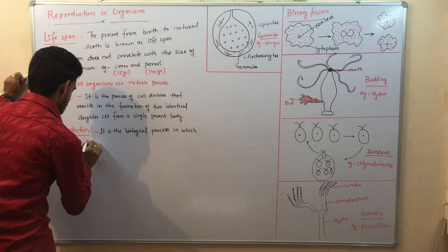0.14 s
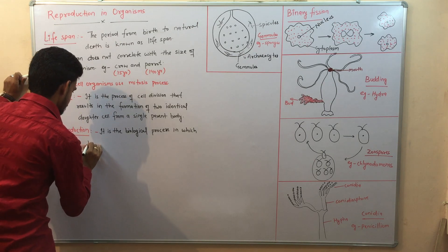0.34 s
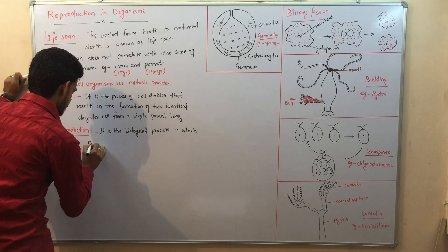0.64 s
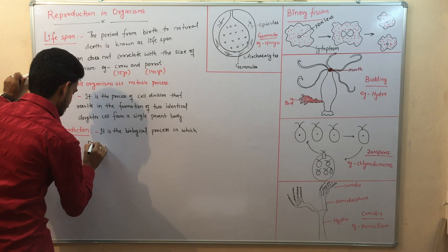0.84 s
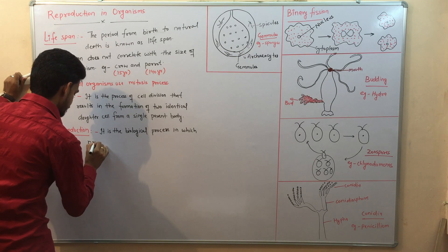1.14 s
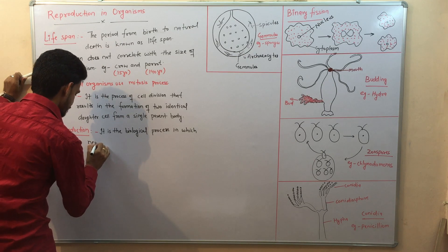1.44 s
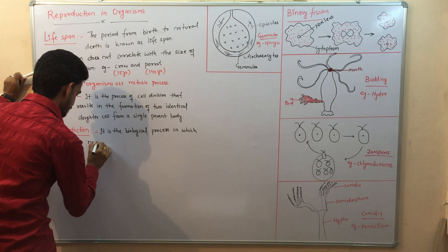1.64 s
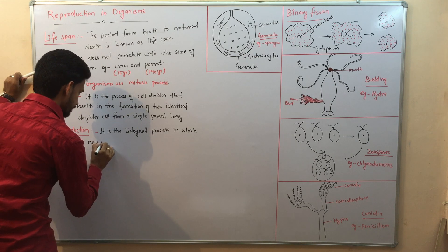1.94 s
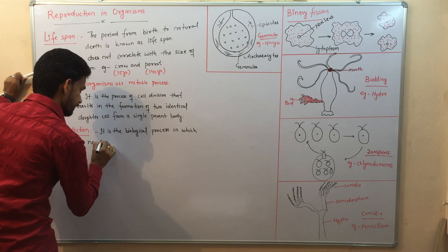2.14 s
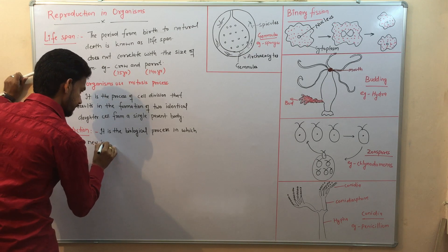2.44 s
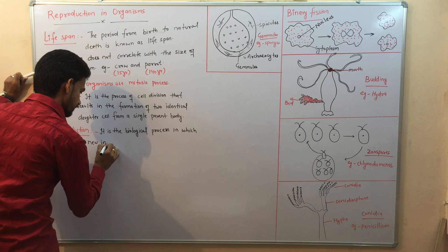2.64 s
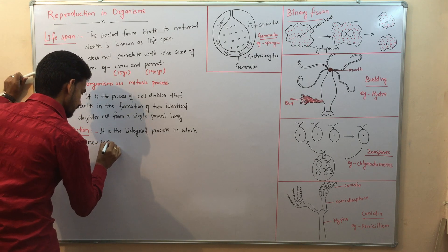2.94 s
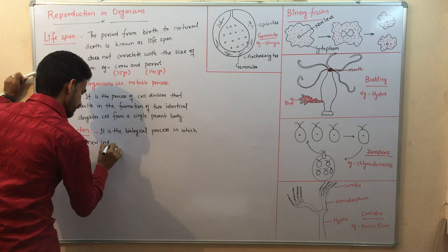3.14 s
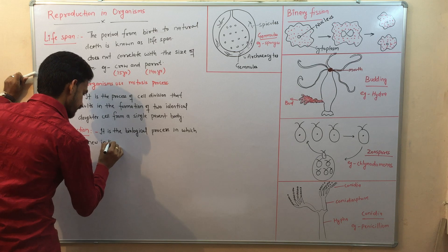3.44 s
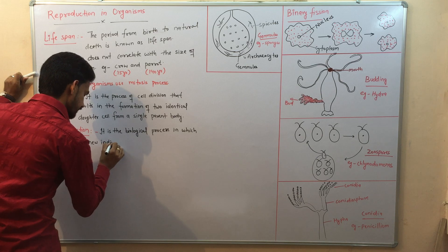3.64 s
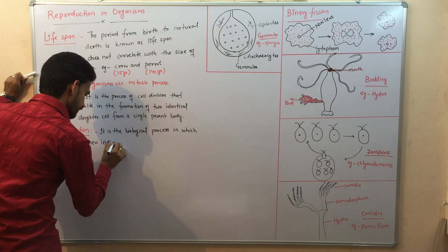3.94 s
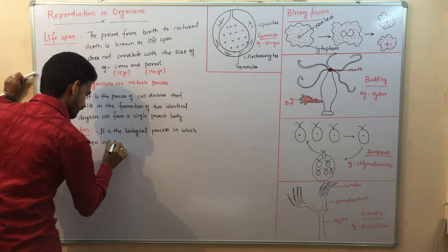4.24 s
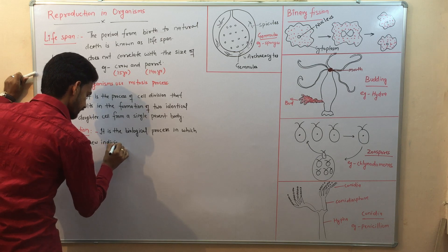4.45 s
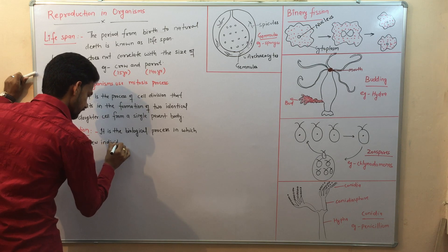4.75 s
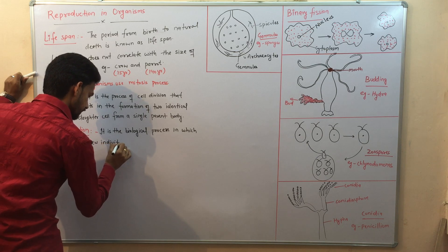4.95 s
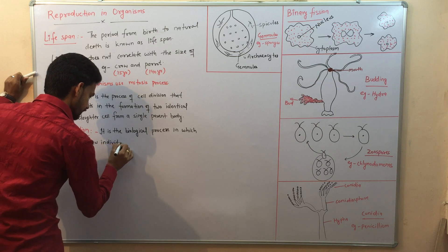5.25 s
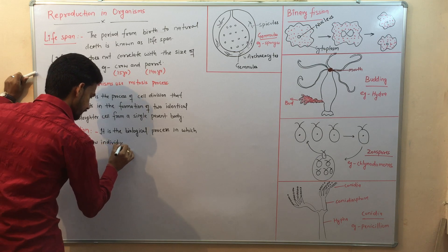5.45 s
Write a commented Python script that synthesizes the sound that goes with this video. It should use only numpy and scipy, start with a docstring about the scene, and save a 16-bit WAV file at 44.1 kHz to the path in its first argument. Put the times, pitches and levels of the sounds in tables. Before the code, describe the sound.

A felt marker writes in quick hissing strokes on a whiteboard, with hollow taps, tiny clicks and a low hum in a quiet room.

```python
"""A felt marker writes on a thin wall-hung whiteboard in a quiet room. Its nib hisses in short strokes: noise
shaped by the ringing of nib and barrel. The sliding also drags on the board, and the nib sometimes squeaks.
Pen and knuckle taps ring the board's modes and rattle it; the pen's plastic ticks now and then.
The board sways under taps and hand. A low hum and broad room noise lie under it all."""
import sys
import numpy as np
from scipy import signal
from scipy.fft import rfft, irfft, next_fast_len
from scipy.io import wavfile
from scipy.ndimage import uniform_filter1d, map_coordinates

SR = 44100
rng = np.random.default_rng(int(sys.argv[2]) if len(sys.argv) > 2 else 0)


def to_wav(s):
    """Save 16-bit WAV."""
    ch = np.atleast_2d(s).T  # columns
    pcm = np.round(np.clip(ch, -1, 1) * 32767)  # PCM
    wavfile.write(sys.argv[1], SR, pcm.astype(np.int16))


def ratio_of_db(decibels):
    """Turn decibels (scalar or array-like) into linear amplitude factors; 0 dB maps to 1."""
    return 10 ** (np.asarray(decibels, float) / 20)


N = 247448  # length of the scene in samples


def unit(x):
    """Scales a sound to rms 1."""
    return x / np.sqrt(np.mean(x ** 2) + 1e-20)


def along(points, hz):
    """Reads a curve of (f/Hz, value) points on a log frequency axis."""
    f, value = np.transpose(points)
    return np.interp(np.log(hz + 1), np.log(f + 1), value)


def curves(rows):
    """Draws one curve over the whole scene for each column after the time."""
    s, *columns = np.transpose(rows)
    return [np.interp(np.arange(N) / SR, s, column) for column in columns]


def wobble(rate):
    """A smooth random curve through `rate` random points a second."""
    points = rng.standard_normal(int(N * 400 / SR) + 4)
    return map_coordinates(points, [np.arange(N) * rate / SR])


def filtered(x, response):
    """Filters x by a (possibly complex) response of frequency."""
    m = next_fast_len(N + SR // 2)
    return irfft(rfft(x, m) * response(np.fft.rfftfreq(m, 1 / SR)), m)[:N]


def noise(spectrum):
    """Coloured noise of rms 1."""
    return unit(filtered(rng.standard_normal(N), lambda hz: ratio_of_db(along(spectrum, hz))))


def resonance(hz, centre, width):
    """One causal resonance of peak gain 1."""
    return 1j * hz * width / (centre ** 2 - hz ** 2 + 1j * hz * width)


def add(track, s, sound):
    """Mixes a sound into the track at time s."""
    track[round(s * SR):][:len(sound)] += sound


def patchy(x, patchy_db):
    """Random gain patches in time and frequency: the contact keeps changing."""
    z = signal.stft(x, nperseg=256)[2]
    across_pitch = uniform_filter1d(rng.standard_normal(z.shape), size=4, axis=0)
    field = uniform_filter1d(across_pitch, size=10, axis=1)
    return signal.istft(z * ratio_of_db(patchy_db * unit(field)), nperseg=256)[1][:N]


# pen strokes; the levels set the balance between strokes, before each layer's overall gain:
# (start t/s, rise t/ms, length t/ms, hiss level/dB, drag on the board level/dB above the hiss)
PEN_STROKES = [(0.31, 55, 110, -60, -5.5), (0.46, 7.7, 82, -61.5, -4), (.544, 130, 100, -58, -7.5),
               (.862, 17, 40, -75.5, 2), (.914, 35, 68, -67, -3.5), (1.004, 55, 113, -65.5, -6.5),
               (1.268, 7.2, 83, -65.5, -4), (1.376, 49, 41, -62.5, -3), (1.467, 5.5, 70, -66.5, -5.5),
               (1.568, 82, 82, -58, -4.5), (1.721, 16, 115, -86, 8.5), (1.954, 25, 97, -62, -4.5),
               (2.19, 3.9, 89, -81, 8), (2.353, 29, 76, -59.5, -7), (2.475, 33, 105, -60.5, -1),
               (2.572, 38, 90, -61.5, -6.5), (2.798, 8.1, 76, -67.5, 2), (2.851, 49, 118, -67, 1),
               (2.985, 68, 86, -58.5, -8), (3.105, 15, 81, -55, -10), (3.334, 16, 76, -58, -7.5),
               (3.57, 35, 40, -68, -1), (3.717, 4, 92, -57.5, -7.5), (3.852, 2.3, 91, -56, -4),
               (4.039, 9.5, 86, -62, -6.5), (4.285, 8.8, 42, -75, -4), (4.469, 4.3, 32, -76, 15),
               (4.498, 17, 125, -65, -1.5), (4.637, 130, 110, -58.5, -2), (4.777, 21, 96, -60.5, -6.5),
               (4.986, 3.6, 21, -79.5, 13.5), (5.029, 11, 92, -62.5, -2), (5.127, 81, 97, -58, 0),
               (5.385, 8.3, 27, -74, 9), (5.436, 9.9, 93, -63.5, -3.5), (5.547, 35, 132, -66, -6)]
# the barrel rings relatively more in soft and in slowly rising strokes: level of an average stroke in dB,
# dB lost per dB of hiss, dB gained per doubling of the rise over 20 ms
USUAL_DB, BARREL_PER_DB, BARREL_PER_RISE_DB = -64.5, 0.89, 1.5
BITE, LIFT = 0.55, 3.6  # how sharply a stroke starts (small = sudden) and ends (large = sudden)


def strokes():
    """Each stroke's speed drives the hiss of the felt, the ring of the barrel and the drag on the board."""
    power, ms = np.zeros((3, N + SR)), np.arange(SR // 3) * 1000 / SR
    for s, rise_ms, length_ms, db, drag_db in PEN_STROKES:
        barrel_db = BARREL_PER_RISE_DB * np.log2(rise_ms / 20) - BARREL_PER_DB * (db - USUAL_DB)
        # the nib bites at once, gains speed, then lifts off
        speed = np.minimum(ms / rise_ms, 1) ** BITE * np.exp(-(ms / length_ms) ** LIFT)
        for row, extra_db in zip(power, (0, barrel_db, drag_db)):
            add(row, s, (ratio_of_db(db + extra_db) * speed) ** 2)
    slide, barrel, drag = np.sqrt(power[:, :N] + 1e-12)
    # the fibres slip in dense grains: fast and slower wobbles of the level in dB
    slips = unit(ratio_of_db(0.33 * wobble(300) + 1.8 * wobble(40)))
    hiss = ratio_of_db(5.5) * slide * slips * felt(stroke_barrel_db=20 * np.log10(barrel / slide))
    return hiss + skin_drag(drag) + board_drag(drag)


# colour of the hiss as the pen moves along the line; levels are relative:
# (t/s, nib resonance f/Hz, nib ring level/dB, broad hiss level/dB, barrel ring level/dB)
GRIP_COLOUR = [(.3, 4690, -7, 10, -2), (.9, 4660, -19, 13, -12), (1.6, 4500, -5, 8, -1),
               (2.0, 4500, -2, 6, -4), (2.55, 4440, -4, 5, -1), (2.85, 4700, -7, 8, -3.5),
               (3.35, 4630, 0.5, 0, -1.5), (3.85, 4650, -1, 0.5, -1.5), (4.05, 4830, -3.5, -1.5, 0.5),
               (4.65, 4720, -2, 5, 0), (5.05, 4700, 0.5, -1.5, 5), (5.2, 4550, 0.5, -2, 0),
               (5.5, 4660, -1.8, 0, 2)]
# nib resonances: (multiple of the nib resonance f, width f/Hz, relative level/dB)
NIB_RESONANCES = [(1.0, 390, 2.5), (1.12, 630, -0.5)]
# barrel resonances: (f/Hz, width f/Hz, relative level/dB)
BARREL_RESONANCES = [(6950, 770, 0.5), (8210, 1400, -15.5)]
# colour of the broad part of the hiss: (f/Hz, relative level/dB per Hz)
BROAD_HISS = [(2000, -24), (3400, 6.5), (5300, -13), (6300, -11), (9500, -13.5), (10700, -17), (11800, -17),
              (13500, -16.5), (15500, -21)]


def felt(stroke_barrel_db):
    """Noise of slipping fibres: nib and barrel resonances over a broad hiss, in random patches."""
    nib_hz, ring_db, air_db, barrel_db = curves(GRIP_COLOUR)
    hz, t, z = signal.stft(rng.standard_normal(N), SR, nperseg=256)
    hz = hz[:, None]

    def at(curve):
        """The curve's value at each short slice of the noise."""
        return curve[np.minimum(t * SR, N - 1).astype(int)]

    def peak(centre, width, db):
        """A resonant bump in the spectrum."""
        return ratio_of_db(db) * abs(resonance(hz, centre, width)) ** 2

    # the higher nib resonance also follows the barrel's level
    nib = sum(peak(k * at(nib_hz), width, db + at(ring_db + (k > 1) * barrel_db))
              for k, width, db in NIB_RESONANCES)
    barrel = sum(peak(centre, width, db + at(stroke_barrel_db + barrel_db))
                 for centre, width, db in BARREL_RESONANCES)
    air = ratio_of_db(along(BROAD_HISS, hz) + at(air_db) + 1.0)
    # below its resonance the small nib hardly radiates
    edge = 1 / (1 + (.92 * at(nib_hz) / hz) ** 24) + .13
    hiss = signal.istft(z * edge * (nib + barrel + air), nperseg=256)[1][:N]
    return patchy(hiss, patchy_db=2.5)


# colour of the drag before the skin's resonances: (f/Hz, relative level/dB per Hz)
DRAG_COLOUR = [(200, -29), (600, 5), (1000, 7), (1400, 10), (1800, 9), (2200, 0.5), (3200, -2.5),
               (4200, -5)]
# resonances of the board's skin under the sliding nib: (f/Hz, width f/Hz, relative level/dB)
SKIN_RESONANCES = [(710, 59, 13.5), (774, 23, 11.5), (1040, 40, 1), (1422, 30, 9), (1836, 23, -25.5),
                   (2340, 53, 1), (3320, 910, 1)]


def skin_drag(drag):
    """The dragging nib is heard through the board's skin, whose resonances colour the noise."""
    def response(f):
        return 1 + sum(ratio_of_db(db) * abs(resonance(f, centre, width)) ** 2
                       for centre, width, db in SKIN_RESONANCES)
    return drag * patchy(unit(filtered(noise(DRAG_COLOUR), response)), patchy_db=4)


# the board's own tones, or modes: (f/Hz, relative level/dB, time to fall 60 dB t/s)
BOARD_MODES = [(56.5, -3, 0.12), (81.3, -9.5, 0.65), (116.3, 7.5, 0.047), (141.5, -9.5, 0.69), (170, -9, 1),
               (179.2, -8, 1), (231.6, -10.5, 0.22), (266.6, -12.5, 0.86), (383, -20.5, 0.69),
               (400.5, 1.5, 0.096), (404.5, -17.5, 0.85), (466.3, -1.5, 0.22), (559, -0.5, 0.2),
               (617, -7.5, 0.28), (660, 1.5, 0.21), (747, -15, 0.51), (905, -7, 0.18), (1017, -6.5, 0.29),
               (1475, -5.5, 0.39)]


def board_drag(drag):
    """The sliding nib is a steady random push that keeps the board modes ringing."""
    def response(f):
        # a mode that fades quickly is a wide resonance
        return sum(ratio_of_db(db) * resonance(f, centre, 3 / t60) for centre, db, t60 in BOARD_MODES)
    return ratio_of_db(16.5) * filtered(drag * rng.standard_normal(N), response)


# brief catches of the nib: (start t/s, length t/ms, relative level/dB, starting f/Hz)
NIB_CATCHES = [(1.636, 35, -72.5, 1340), (2.201, 21, -69, 1400), (2.205, 8.1, -75, 3030),
               (2.814, 51, -73, 1340), (2.835, 44, -75.5, 2960), (3.051, 57, -82, 3050),
               (4.469, 26, -66, 1384), (4.469, 10, -73.5, 2450), (4.49, 38, -79, 3130),
               (4.989, 18, -65.5, 1410)]
ONSET = .5  # under 1: a squeak swells faster than it fades
SAG = 0.083  # share of its pitch that a squeak loses


def scrapes():
    """The nib catches and squeaks: a gliding tone smeared by fast jitter."""
    out = np.zeros(N + SR)
    jitter = wobble(350)
    for s, length_ms, db, start_hz in NIB_CATCHES:
        n = int(length_ms * SR / 1000)
        hz = start_hz * np.linspace(1, 1 - SAG, n) * (1 + .16 * jitter[round(s * SR):][:n])
        swell = np.sin(np.pi * np.linspace(0, 1, n) ** ONSET) ** 2
        add(out, s, ratio_of_db(db + 14.5) * swell * np.sin(2 * np.pi * np.cumsum(hz) / SR))
    return out[:N]


# taps, each heard a few ms after its time; levels are relative:
# (t/s, tap level/dB, middle modes level/dB, high modes level/dB)
BOARD_TAPS = [(0.281, -40, 8, -10), (0.458, -49.5, 9.5, 14.5), (0.836, -42.5, 0, -18), (1.065, -58, 13, 16),
              (1.223, -38, -3.5, -6), (1.641, -58, 2.5, 25), (1.914, -36.5, 11, -27), (2.174, -31.5, 10, 2),
              (2.349, -29.5, -1, -6), (2.7949, -32, 1, -15), (3.295, -32, 8, -30), (3.54, -30, 12, -2.5),
              (3.7086, -33, 0.5, -18), (4.029, -37, 1.5, -26), (4.251, -30.5, 13, -2.5),
              (4.454, -32, 7, -2), (4.9802, -32.5, 4, -17), (5.382, -29.5, -18.5, -26)]
# rattle of the board's many small modes after a tap: (f/Hz, relative level/dB per Hz)
RATTLE_COLOUR = [(60, -53), (150, 5.5), (260, 9), (330, 1.5), (480, 3), (650, -3), (900, -16.5),
                 (1500, -31), (2500, -60)]
# a harder blow is shorter and wakes the middle modes more: contact ms, ms less per dB of middle modes
CONTACT_MS, HARDER_MS_PER_DB = 1.95, .045
LOW_RISE_DB_PER_S = 1.1  # the modes near 180 Hz speak more as the hand moves in from the board's edge
DETUNE = 0.0061  # typical random share by which each mode's pitch differs from tap to tap


def taps():
    """A smooth push, softer the longer the contact, rings all board modes at slightly new strengths."""
    out, shake, t = np.zeros(N + 2 * SR), np.zeros(N + SR), np.arange(SR) / SR
    shape = (len(BOARD_TAPS), len(BOARD_MODES))
    detune = rng.standard_normal(shape)
    scatter_db = rng.normal(0, 2.04, shape)
    for (s, db, middle_db, high_db), spread, shifts in zip(BOARD_TAPS, scatter_db, detune):
        def place_db(hz):
            """Where the blow lands decides which modes speak."""
            if hz > 450:
                return high_db
            if hz > 300:
                return middle_db
            return LOW_RISE_DB_PER_S * (s - 3) if 150 < hz < 200 else 0

        ring = 0
        for (hz, level, t60), extra_db, shift in zip(BOARD_MODES, spread, shifts):
            fade = ratio_of_db(level + extra_db + place_db(hz) - 60 * t / t60)
            ring = ring + fade * np.cos(2 * np.pi * hz * (1 + DETUNE * shift) * t)
        contact_ms = CONTACT_MS - HARDER_MS_PER_DB * middle_db
        # the push peaks at two thirds of the contact time and then dies away
        u = t[:SR // 40] * 6000 / np.clip(contact_ms, .3, 8)
        push = u ** 4 * np.exp(-u)
        add(out, s + 0.00345, ratio_of_db(db - 7.5) * signal.fftconvolve(ring, push / push.sum()))
        rattle = ratio_of_db(db + .6 * middle_db - 19 - 60 * t / .28) * (1 - np.exp(-(t / .004) ** 2))
        add(shake, s + .0045, rattle)
    return out[:N] + shake[:N] * noise(RATTLE_COLOUR)


# plastic ticks: (t/s, relative level/dB, f/Hz)
PLASTIC_TICKS = [(0.0404, -36.5, 5670), (0.065, -34.5, 6560), (0.0946, -43, 4070), (0.152, -36.5, 6200),
                 (0.252, -40, 6330), (0.3248, -37, 4680), (.633, -33, 6100), (1.2288, -44, 7640),
                 (1.6464, -33, 4100), (2.1853, -32.5, 6200), (2.2483, -40.5, 4400), (2.805, -37, 6800),
                 (3.6032, -40.5, 4300), (4.2554, -45, 4840)]


def ticks():
    """A tiny plastic click: one mode of a millisecond or two, a lower partner and a puff of noise."""
    out, t = np.zeros(N + SR), np.arange(SR // 50) / SR
    puffs = uniform_filter1d(rng.standard_normal((len(PLASTIC_TICKS), len(t))), size=3, axis=1)
    onset = 1 - np.exp(-t / .00015)
    for (s, db, hz), puff in zip(PLASTIC_TICKS, puffs):
        click = np.sin(2 * np.pi * hz * t) + .3 * np.sin(2 * np.pi * .62 * hz * t)
        fading = click * ratio_of_db(-60 * t / 0.0021) + 0.23 * puff * ratio_of_db(-60 * t / 0.033)
        add(out, s, ratio_of_db(db - 4.0) * onset * fading)
    return out[:N]


# the whole board swinging on its hooks; levels are relative:
# (f/Hz, level/dB after a tap, level/dB from the leaning hand, time to fall 60 dB t/s)
BOARD_SWING = [(8.185, 2.5, -42.5, 2.44), (11.49, -4, -36, 0.45), (18.15, -23, -57.5, 2.5),
               (24.76, -2.5, -41.5, 1.8)]
# how hard the hand leans on the board: (t/s, relative level/dB)
HAND_LEAN = [(0, -5.5), (.35, -5), (.8, -4), (1.4, 1), (2.5, -2), (3.6, 1.5), (5.61, 1.5)]


def sway():
    """Every tap sets the board swinging; the leaning hand's random push keeps it moving."""
    blows, t, out = np.zeros(N), np.arange(2 * SR) / SR, 0
    for s, db, *_ in BOARD_TAPS:
        blows[round(s * SR)] = ratio_of_db(db)
    hand_db, = curves(HAND_LEAN)
    for hz, tap_db, lean_db, t60 in BOARD_SWING:
        ring = ratio_of_db(-60 * t / t60) * np.sin(2 * np.pi * hz * t)
        tapped = signal.fftconvolve(blows, ring)[:N]
        # the first two seconds are skipped, so the swing is already under way
        leaning = unit(signal.fftconvolve(rng.standard_normal(N + len(t)), ring)[len(t):][:N])
        out = out + ratio_of_db(tap_db) * tapped + ratio_of_db(lean_db + hand_db) * leaning
    return out


# hum bands, each narrowed further by filtering twice: (f/Hz, width f/Hz of one pass, relative level/dB)
HUM_BANDS = [(58.6, 4.8, -5.5), (82.9, 5.7, -11.5)]
# loudness of the hum bands together: (t/s, relative level/dB)
HUM_LOUDNESS = [(0, -43), (.35, -43.5), (.8, -56.5), (2.5, -54), (3, -45.5), (3.6, -53), (4.1, -45.5),
                (4.6, -48), (5.1, -50), (5.61, -48.5)]


def low_hum():
    """Narrow bands of noise make an unsteady low hum."""
    hum = 0
    for centre, width, db in HUM_BANDS:
        band = filtered(rng.standard_normal(N), lambda f: resonance(f, centre, width) ** 2)
        hum = hum + ratio_of_db(db) * unit(band)
    return ratio_of_db(curves(HUM_LOUDNESS)[0]) * hum


# colour of the room noise: (f/Hz, relative level/dB per Hz)
ROOM_COLOUR = [(26, -29), (45, -7), (123, -22), (196, -19.5), (335, -32), (408, -24.5), (472, -32),
               (682, -30.5), (850, -37.5), (1420, -39.5), (2050, -45), (6810, -51), (15600, -56)]
# faint band of hum near 580 Hz: (t/s, level/dB)
FAINT_HUM = [(0, -72.5), (2.6, -72), (3.2, -75), (4.6, -76.5), (5.2, -86)]
ROOM_DB = -66  # usual level of the room noise between 300 and 2500 Hz


def room():
    """Broad room noise that drifts in level, with a faint band of hum in the low mids."""
    air = noise(ROOM_COLOUR)
    mids = filtered(air, lambda f: (f > 300) & (f < 2500))
    drifting = ratio_of_db(ROOM_DB + 1.25 * wobble(2.895)) * air / np.std(mids)
    hum = unit(filtered(rng.standard_normal(N), lambda f: resonance(f, 586.0, 34) ** 2))
    return ratio_of_db(curves(FAINT_HUM)[0]) * hum + drifting


def walls(x):
    """The room answers 400 samples later with a dense random tail that falls 60 dB in 0.34 s."""
    t = np.arange(SR // 2) / SR
    tail = rng.standard_normal(len(t)) * ratio_of_db(-60 * t / 0.34)
    return signal.fftconvolve(np.pad(x, (400, 0)), tail / np.linalg.norm(tail))[:N]


def scene():
    """Pen and board with the room's answer, over sway, hum and room noise."""
    pen = strokes() + scrapes() + taps() + ticks()
    return (pen + ratio_of_db(-8.5) * walls(pen) + sway() + low_hum() + room())[None]


def roll_off(x):
    """The treble ends steeply here."""
    return signal.sosfilt(signal.butter(12, 15800, fs=SR, output="sos"), x)


def record(dry):
    """Passes the finished mix through the last step."""
    return roll_off(dry)


dry = scene()
out = record(dry)
to_wav(out)
```